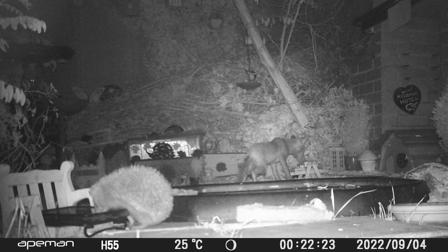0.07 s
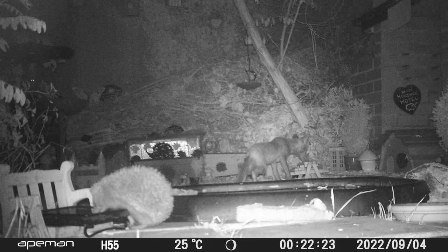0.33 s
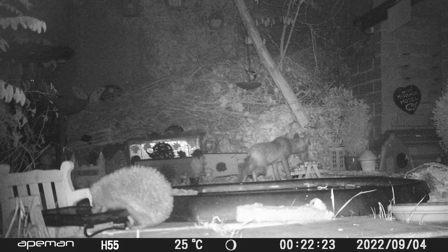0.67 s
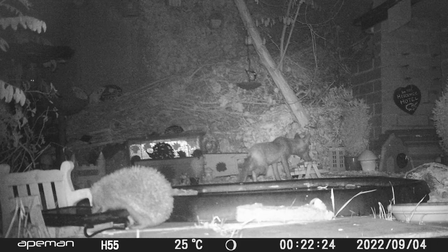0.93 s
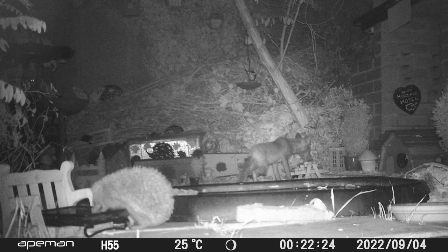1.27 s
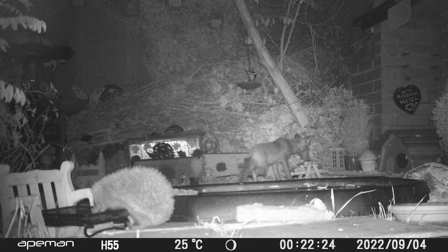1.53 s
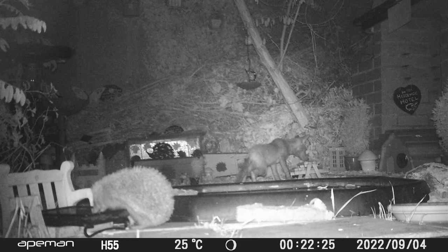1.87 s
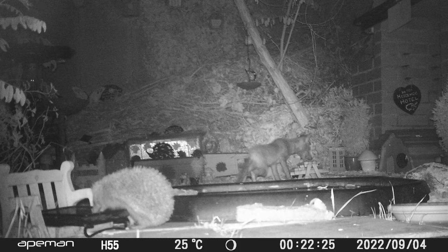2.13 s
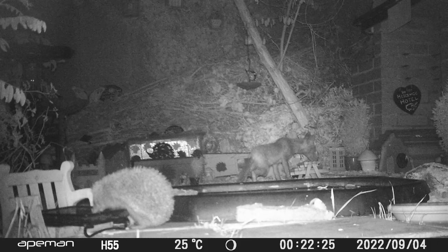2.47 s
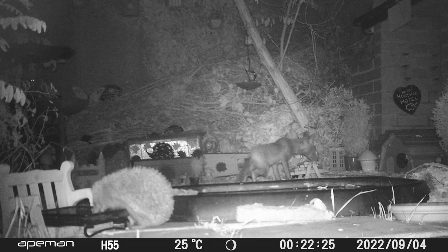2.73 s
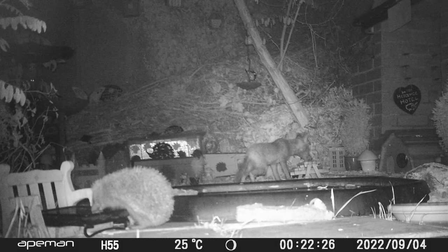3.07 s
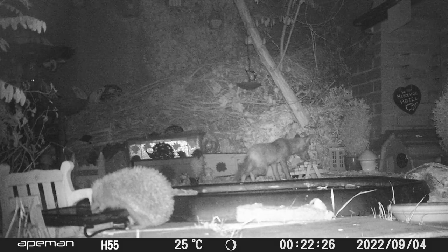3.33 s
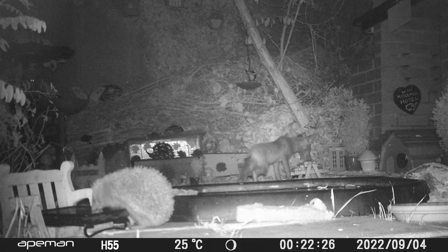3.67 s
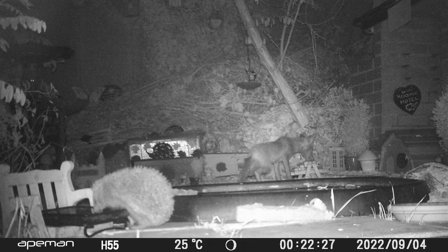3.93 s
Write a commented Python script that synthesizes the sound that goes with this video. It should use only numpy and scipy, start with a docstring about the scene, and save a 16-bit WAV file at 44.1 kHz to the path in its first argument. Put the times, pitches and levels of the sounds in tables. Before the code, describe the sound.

Low throbbing electrical rumble and hiss over a quiet night garden, with one light wooden knock.

```python
"""A trail camera's electronics throb five times a second, swelling a low rumble and a thin fizz.
Behind them lies a still garden at night: steady hiss, a faint whine and the far hum of town.
Small animals moving about make one light wooden knock, a few soft scuffs and tiny ticks."""
import sys
import numpy as np
from scipy import signal
from scipy.fft import rfft, irfft
from scipy.io import wavfile

SR = 44100
rng = np.random.default_rng(int(sys.argv[2]) if len(sys.argv) > 2 else 0)


def pcm_store(signal):
    """Save signal as 16-bit PCM."""
    levels = np.round(np.clip(np.atleast_2d(signal), -1, 1) * 32767)
    wavfile.write(sys.argv[1], SR, levels.astype(np.int16).T)


N = 176400


def undb(db):
    """Decibels to gain."""
    return 10 ** (np.asarray(db) / 20)


def noise(spectrum, even=0):
    """Noise of rms 1 coloured by (f/Hz, level/dB) points; even (0-1) steadies its level."""
    hz, db = np.array(spectrum, float).T
    octave, points = np.log2(np.maximum(np.fft.rfftfreq(N, 1 / SR), 1)), np.log2(hz)
    outside = np.abs(octave - np.clip(octave, points[0], points[-1]))
    gain = undb(np.interp(octave, points, db) - 36 * outside)  # skirts of 36 dB per octave
    x = irfft(rfft(rng.standard_normal(N)) * gain, N)
    if even:
        steady = rfft(x / np.abs(signal.hilbert(x)) ** even)
        x = irfft(gain * np.exp(1j * np.angle(steady)), N)
    return x / np.std(x)


def walk(per_s):
    """A random wander through per_s points a second, with a spread near 1."""
    steps = rng.standard_normal(N // 100)
    return np.interp(np.arange(N) / SR * per_s, np.arange(len(steps)), steps)


def ring(age, attack_s, t60_s):
    """A quick attack and an exponential tail, silent before age 0."""
    return np.clip(age / attack_s, 0, 1) * np.exp(-np.log(1000) * np.maximum(age, 0) / t60_s)


def bursts(t, events, attack_s, t60_s):
    """Summed burst envelopes, one for each (t/s, level/dB) cue."""
    return sum(undb(db) * ring(t - start, attack_s, t60_s) for start, db in events)


# Colour of the street wash and of its drone: f/Hz, level/dB
WASH_EQ = [(100, -6), (160, -5), (200, 0.5), (280, -1.5), (400, -5.5), (500, -9), (570, -17), (640, -30)]
DRONE_EQ = [(240, -17.5), (290, 2.5), (340, -1.5), (420, -12.5)]
# Fader ride of the wash: t/s, level/dB
WASH_RIDE = [(0, -69), (1.2, -69.5), (2.3, -68.5), (3, -69), (4, -70)]

def town(t):
    """The dull wash of far-off streets; a narrower drone fades in towards the end."""
    wash = undb(np.interp(t, *np.array(WASH_RIDE).T)) * noise(WASH_EQ)
    fade_in = np.clip((t - 3.02) / .23, 0, 1)
    return wash + undb(-73.5) * fade_in * noise(DRONE_EQ)


# Colour of the steady rumble and hiss: f/Hz, level/dB
RUMBLE_EQ = [(8, -3), (25, 1), (45, -3.5), (70, -9), (100, -10.5), (125, -18), (160, -32), (250, -51)]
HISS_EQ = [(620, -17.5), (720, -6.5), (800, -1.5), (1100, -0.5), (1600, -2.5), (2300, -5), (3200, -9.5),
           (4000, -13), (4800, -17.5), (5600, -17), (6300, -14), (7500, -13.5), (8000, -18.5),
           (8700, -38.5)]

def camera_bed(t):
    """The electronics' constant noise floor: rumble, hiss and a thin whine."""
    whine = undb(-88.5) * np.sin(2 * np.pi * 6500 * t)
    return undb(-54) * noise(RUMBLE_EQ, even=.5) + undb(-72) * noise(HISS_EQ) + whine


# Tick cues: t/s, level/dB
TICK_CUES = [(2.045, -71), (2.099, -66.5)]
# Their bright colour: f/Hz, level/dB
TICK_EQ = [(3600, -30), (4100, -2), (4450, -4), (4850, -4), (5200, -10), (7000, -27)]

def twig_ticks(t):
    """Tiny dry snaps of twigs and leaves that die at once."""
    return noise(TICK_EQ) * bursts(t, TICK_CUES, attack_s=.002, t60_s=.026)


# Scuff cues: t/s, level/dB
SCUFF_CUES = [(1.44, -65), (2.305, -70), (3.967, -64.5)]
# Their midrange colour: f/Hz, level/dB
SCUFF_EQ = [(750, -9), (1100, 7), (1800, -9), (2500, -1), (4000, -14)]

def paw_scuffs(t):
    """Soft, dull brushes of paws on the ground."""
    return noise(SCUFF_EQ) * bursts(t, SCUFF_CUES, attack_s=.0083, t60_s=.085)


# Contacts that blend into one knock: t/s, relative level/dB
KNOCK_CUES = [(2.9918, -54), (2.99309, -53), (2.9965, -58), (3.0097, -64.5)]
# Modes of the wood: f/Hz, relative level/dB, t60/s
WOOD_MODES = [(1110, 5, .035), (1274, 2.5, .022), (1440, -0.5, .019), (1612, -11, 0.013), (2206, -6.5, .02)]

def wood_knock(t):
    """Each contact rings the same short wooden modes; the small piece radiates no bass."""
    out = np.zeros(N)
    for start, db in KNOCK_CUES:
        age = t - start
        for hz, mode_db, t60 in WOOD_MODES:
            envelope = undb(db + mode_db) * ring(age, attack_s=.0003, t60_s=t60)
            out += envelope * np.sin(2 * np.pi * hz * age)
    low_cut = signal.butter(4, 900, "highpass", fs=SR, output="sos")
    return signal.sosfilt(low_cut, out) / 2


PULSE_HZ, PULSE_START_S = 5, .025

def pulse(t, attack_s=.051, hold_s=.026, release_s=.051):
    """The envelope of the camera's repeating load, 0-1."""
    age = (t - PULSE_START_S) % (1 / PULSE_HZ)
    return np.interp(age, np.cumsum([0, attack_s, hold_s, release_s]), [0, 1, 1, 0])


# Colour of the fizz: f/Hz, level/dB
FIZZ_EQ = [(700, -14.5), (1000, -3.5), (2500, -1.5), (4800, -5.5), (6300, -0.5), (7600, 1), (8200, -4),
           (8700, -13.5)]
# Its strongest spits: t/s, level/dB
SPIT_CUES = [(.085, -75), (.252, -76), (.472, -78), (.657, -75), (.846, -78), (1.073, -73), (1.295, -76),
             (1.356, -74.5), (1.648, -75), (2.872, -76), (3.455, -74), (3.865, -76)]

def camera_fizz(t, lead_s=.012):
    """Thin electrical fizz that flickers, spits and throbs just ahead of the low swells."""
    flicker_db = 3.2 * walk(per_s=110)
    throb = undb(-84.5 + flicker_db) * pulse(t + lead_s)
    spits = bursts(t, SPIT_CUES, attack_s=.0039, t60_s=.096)
    return np.hypot(throb, spits) * noise(FIZZ_EQ)  # the envelopes add in power


# Accent of each swell in turn: relative level/dB
SWELL_ACCENTS = [0.5, 2, 1.5, 5, 5, 2, 1, 3, -2.5, 5.5, 4.5, 6.5, 2, 5.5, 4.5, -5.5, 6, -5.5, 7.5, 2]
# Their bass-heavy colour: f/Hz, level/dB
SWELL_EQ = [(8, -2), (30, 0.5), (45, -2.5), (65, -9.5), (100, -16.5), (135, -30), (200, -36.5),
            (450, -43.5), (620, -69.5)]

def camera_swells(t):
    """Low electrical rumble that swells with each pulse of the load."""
    cycle = np.clip(((t - PULSE_START_S) * PULSE_HZ).astype(int), 0, len(SWELL_ACCENTS) - 1)
    return undb(-50) * undb(SWELL_ACCENTS)[cycle] * pulse(t) * noise(SWELL_EQ, even=.9)


def scene():
    """Camera, town and animals in one mono mix."""
    t = np.arange(N) / SR
    camera = camera_swells(t) + camera_fizz(t) + camera_bed(t)
    return (camera + town(t) + twig_ticks(t) + paw_scuffs(t) + wood_knock(t))[None]


def record(dry):
    """The camera cuts the top steeply above 8600 Hz."""
    return signal.sosfilt(signal.ellip(8, .2, 70, 8600, fs=SR, output="sos"), dry)


dry = scene()
out = record(dry)
pcm_store(out)
```